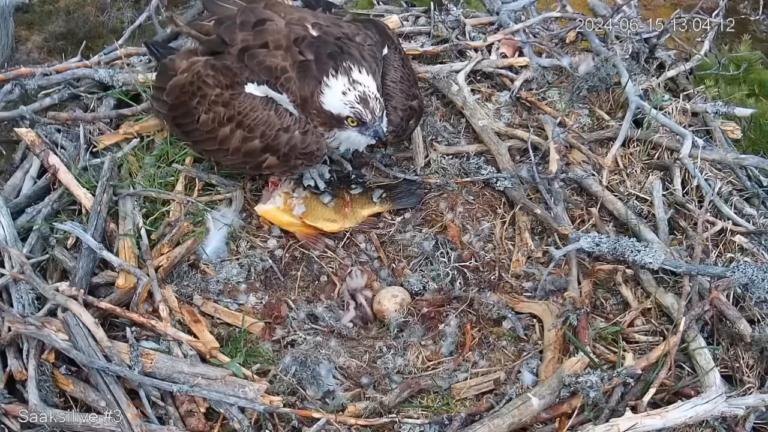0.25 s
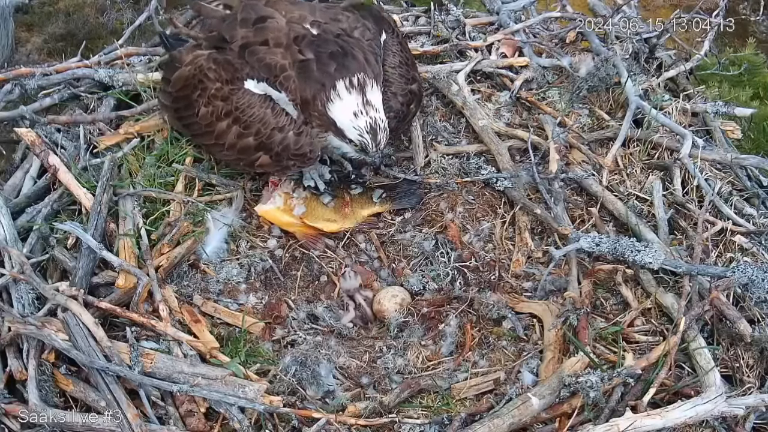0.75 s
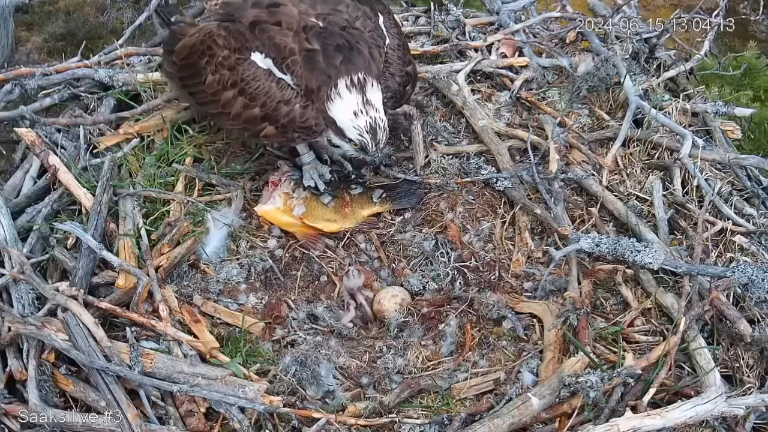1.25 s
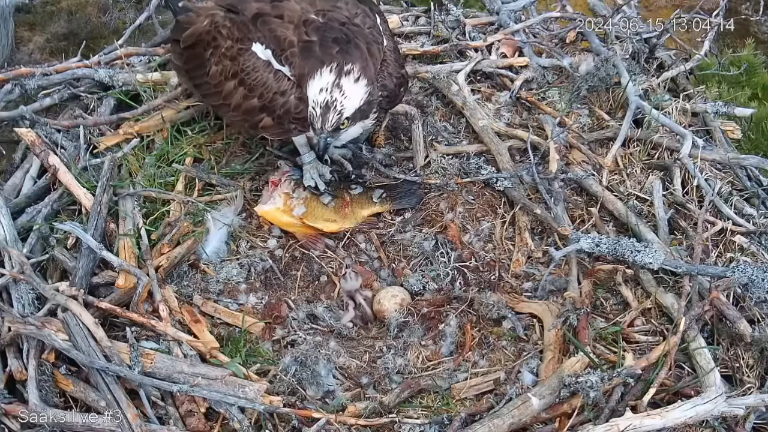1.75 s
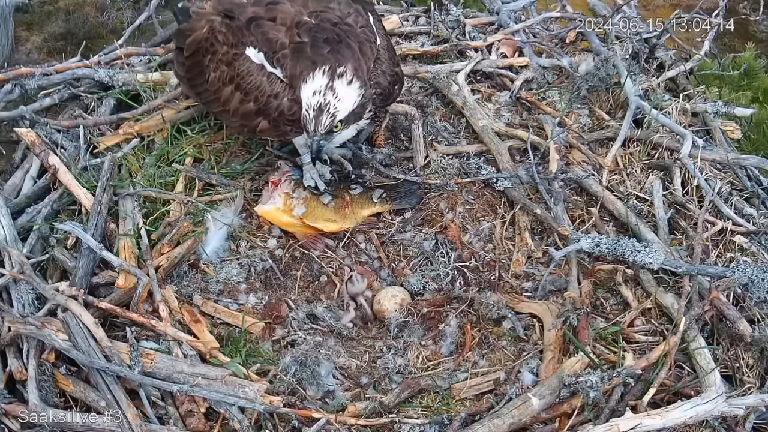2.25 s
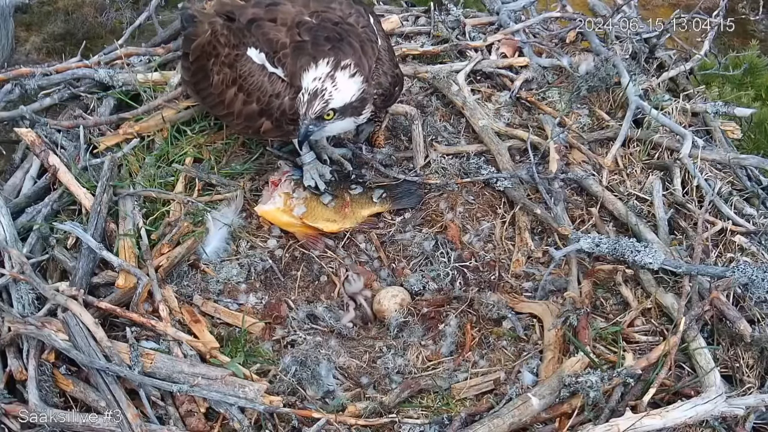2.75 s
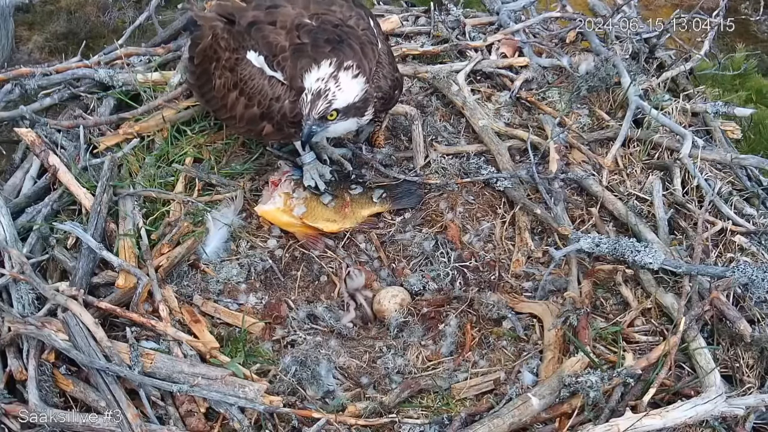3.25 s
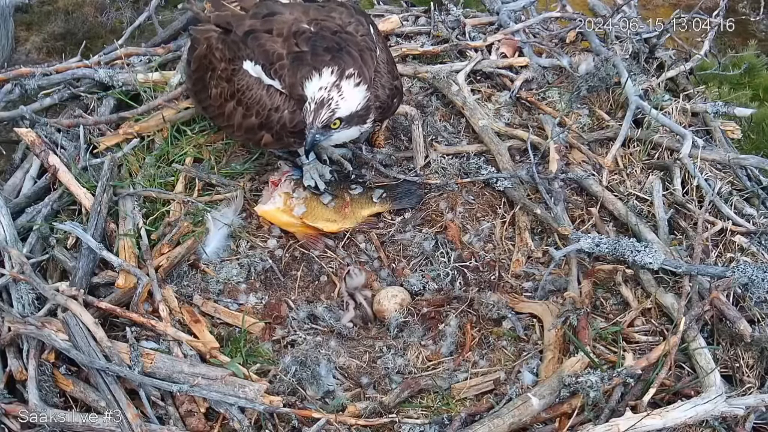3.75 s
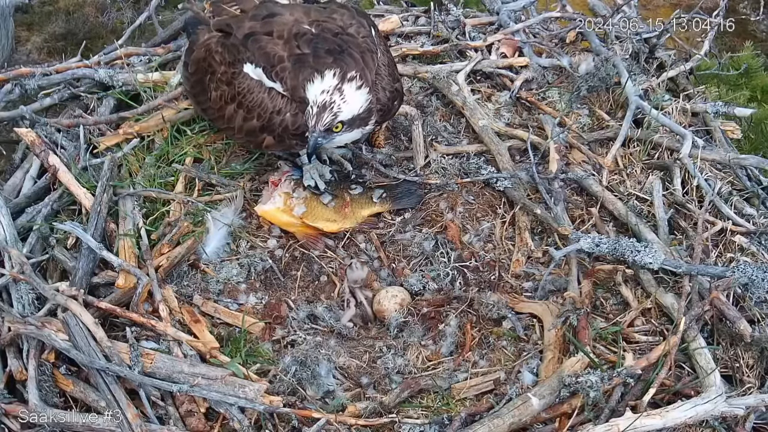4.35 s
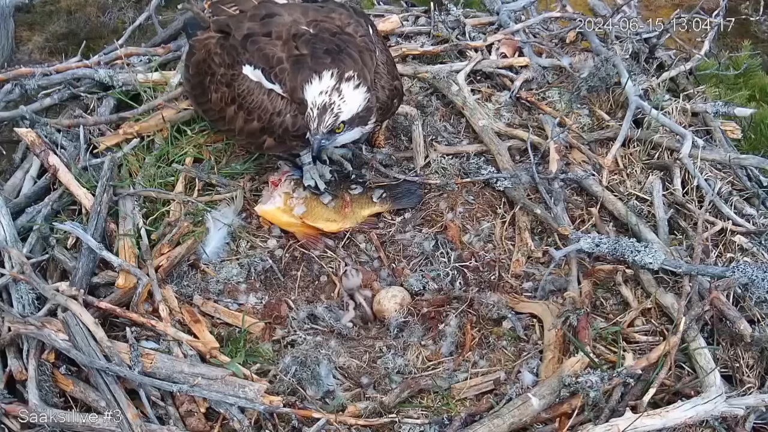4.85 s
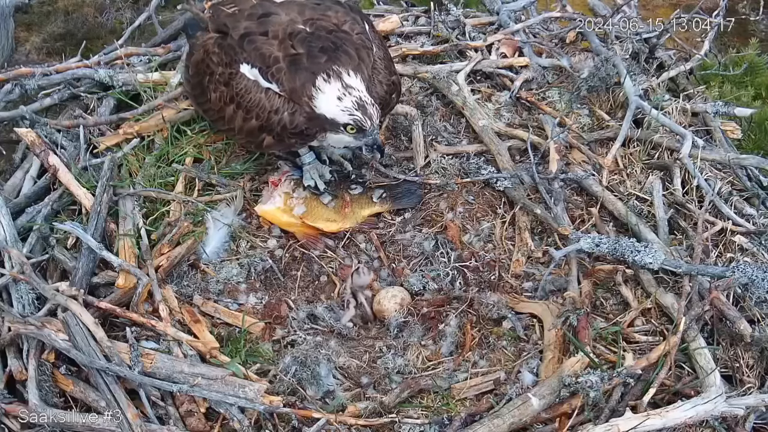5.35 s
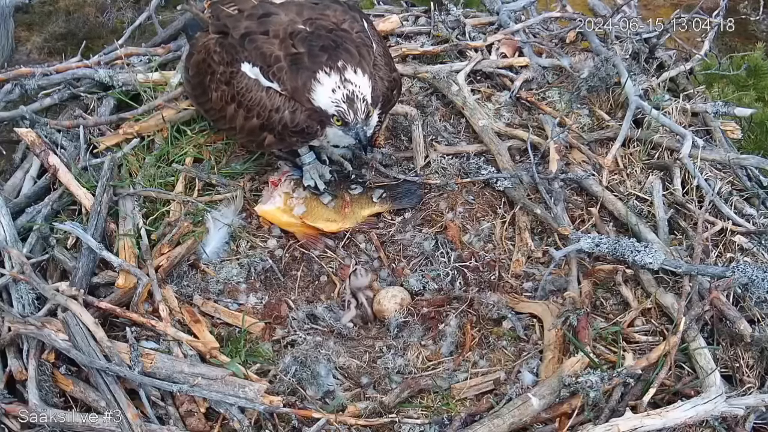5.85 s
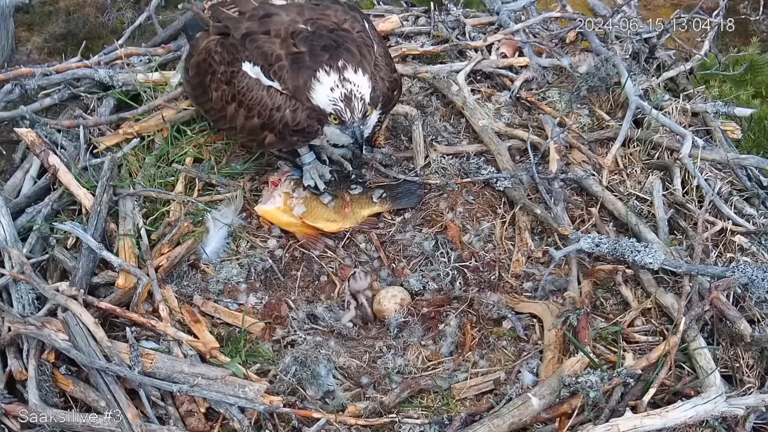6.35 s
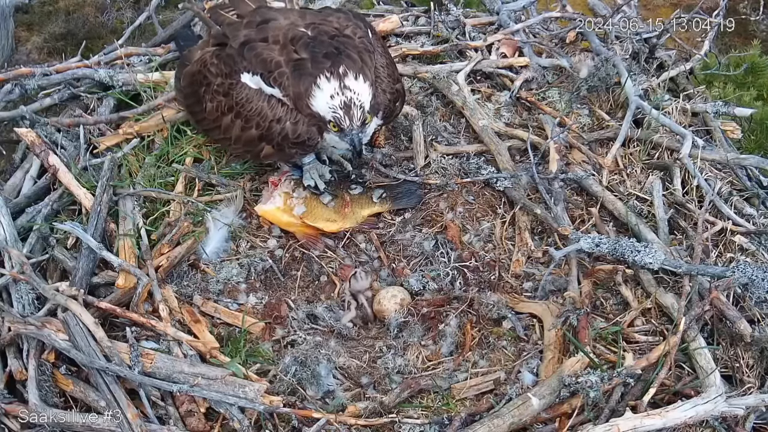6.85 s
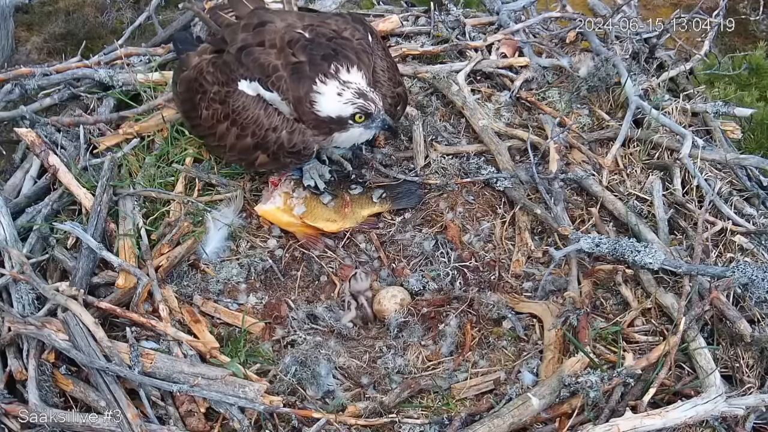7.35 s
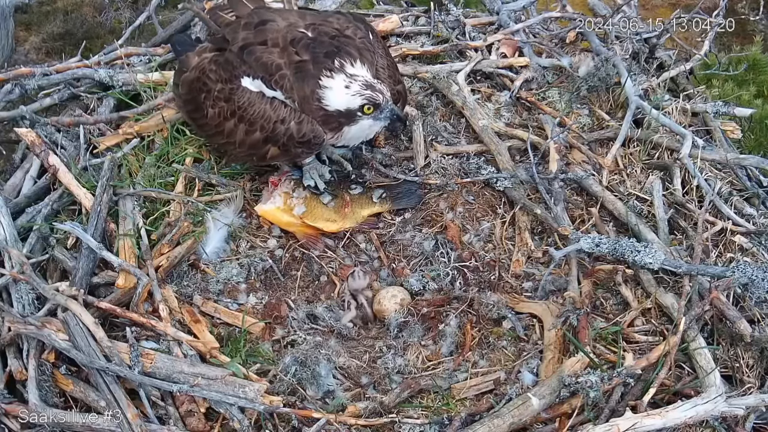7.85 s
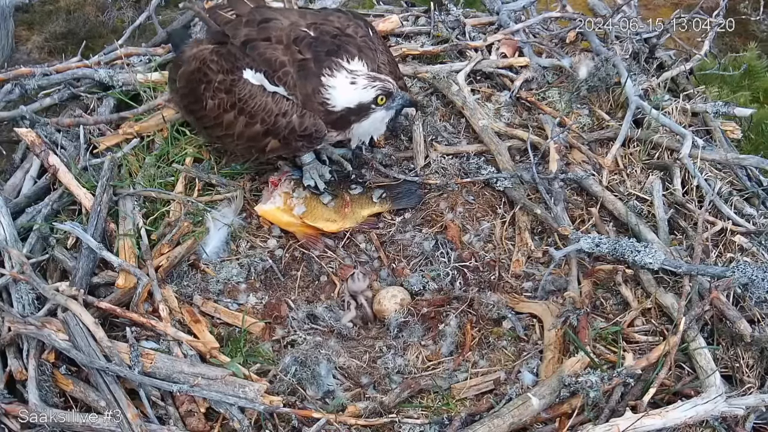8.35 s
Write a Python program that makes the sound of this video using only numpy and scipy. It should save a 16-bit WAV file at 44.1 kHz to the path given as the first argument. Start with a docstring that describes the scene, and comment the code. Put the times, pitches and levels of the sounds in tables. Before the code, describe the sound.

Close bursts of sharp, rasping whistles from an osprey on its nest, then small stick taps and a faint distant songbird.

```python
"""Eight arched begging calls from an osprey, close by on its stick nest.
Each opens as a rasp of rattling syrinx membranes and breaks into a clean whistle, which sometimes
trills as the two sides of the syrinx beat. Beak and talons tap, twigs tick, a small bird sings
far off, and a light breeze hisses in the trees."""
import sys
import numpy as np
from scipy import signal
from scipy.fft import rfft, irfft
from scipy.io import wavfile
from scipy.ndimage import uniform_filter1d, map_coordinates

SR = 44100
rng = np.random.default_rng(int(sys.argv[2]) if len(sys.argv) > 2 else 0)


def inscribe(sig):
    """Save sig as 16-bit PCM at rate SR to the path in sys.argv[1].

    A 1-D sig is mono; a 2-D sig holds one channel per row.
    Samples are clipped to [-1, 1] before scaling.
    """
    pcm = np.round(np.clip(np.atleast_2d(sig).T, -1, 1) * 32767)
    wavfile.write(sys.argv[1], SR, pcm.astype(np.int16))


N = 378819
TIME = np.arange(N) / SR

# syrinx rattles: (start [s], end [s], level [dB], change by the end [dB], swell [s],
# initial slap rate [1/s], throat resonance [Hz], tilt above it [dB/octave])
RATTLES = [(0, 0.08, -42, 3.5, 0.00071, 580, 5800, 0), (0.11, 0.175, -38.5, -13.5, .004, 600, 6050, 1),
           (0.224, 0.264, -43, -4, 0.0011, 940, 6060, 4), (0.566, .791, -42.5, -6, 0.073, 650, 4550, -0.5),
           (1.269, 1.44, -42, -4, 0.029, 640, 4850, 1), (1.565, 1.603, -48, 0, .001, 890, 5800, 8),
           (1.914, 2.092, -36.5, -10, .012, 850, 6330, -4), (2.245, 2.264, -57, -2, 0.0011, 500, 6200, 1),
           (2.499, 2.635, -36.5, -5, .015, 710, 6150, -3), (2.791, 2.822, -39, 2, 0.0051, 940, 6000, -1),
           (3.115, 3.307, -39, 0, .014, 770, 5840, -4), (3.398, 3.456, -44.5, -15, 0.00089, 680, 5470, 4),
           (4.957, 5.215, -40.5, -5.5, 0.0054, 560, 6520, -4),
           (5.674, 5.891, -37, -10, 0.0014, 690, 6170, -0.5)]
# beak and talons on sticks and fish: (time [s], level [dB], t60 [s], centre [Hz], knock re crack [dB])
NEST_TAPS = [(.324, -38.5, 0.013, 5200, 0), (.972, -46, 0.022, 7300, -9), (3.934, -48, 0.031, 4600, -26),
             (4.473, -48.5, 0.023, 9300, -18), (4.574, -55.5, 0.14, 4640, -8),
             (6.167, -50, 0.013, 7400, -12), (6.192, -52.5, 0.15, 4920, -28), (6.277, -51, 0.11, 4670, -15),
             (6.357, -32.5, 0.02, 6740, -6), (6.745, -52.5, 0.045, 7500, -6),
             (6.784, -32.5, 0.0075, 6600, -5.5), (6.792, -42.5, 0.034, 8350, -8),
             (7.883, -43, 0.019, 4660, -18)]


def undb(db):
    """Decibels to gain."""
    return 10 ** (np.asarray(db) / 20)


def unit(x):
    """Scale to rms 1."""
    return x / np.sqrt(np.mean(x ** 2) + 1e-20)


def spectrum_db(points, hz):
    """Interpolate (frequency [Hz], level [dB]) points on a log-frequency axis."""
    point_hz, db = np.transpose(points)
    return np.interp(np.log(np.maximum(hz, 1)), np.log(point_hz), db)


def resonate(x, hz, width_hz):
    """Two-pole resonance, gain 1 at its centre."""
    return signal.lfilter(*signal.iirpeak(min(hz, .45 * SR), hz / width_hz, fs=SR), x)


def band(x, lo_hz, hi_hz):
    """Butterworth band-pass."""
    return signal.sosfilt(signal.butter(2, [lo_hz, hi_hz], "band", fs=SR, output="sos"), x)


def walk(rate_hz, size):
    """Smooth random wander, spread near 1."""
    knots = rng.standard_normal(int(size * rate_hz / SR) + 4)
    return map_coordinates(knots, [1 + np.arange(size) * rate_hz / SR], order=3, mode="nearest")


def span(start_s, end_s):
    """Sample slice between two times."""
    first = int(np.clip(start_s * SR, 0, N - 200))
    return slice(first, int(np.clip(end_s * SR, first + 100, N)))


def arch(first, middle, last, size):
    """Parabola through three values."""
    return np.polyval(np.polyfit([0, .5, 1], [first, middle, last], 2), np.linspace(0, 1, size))


def gate(size, edge_s):
    """Window with rounded edges."""
    return signal.windows.tukey(size, min(1, 2 * edge_s * SR / size))


def add(track, start_s, x):
    """Mix x into track."""
    first = int(np.clip(start_s * SR, 0, N - 1))
    track[first:first + len(x)] += x[:N - first]


def branch_echo(x, wet_db, t60_s):
    """Sticks and branches add a dense, fading echo."""
    t = TIME[:SR // 3]
    echo = rng.standard_normal(len(t)) * undb(-60 * t / t60_s) * (t > .001)
    return x + undb(wet_db) * signal.fftconvolve(x, echo / np.linalg.norm(echo))[:N]


def breeze(leaves_db=10, hiss_db=-58, hiss_gust_share=.31, flicker_db=.9):
    """Leaves swell with the gusts under a steadier hiss; each band flickers."""
    # leaf noise: (frequency [Hz], relative density [dB])
    leaf_spectrum = [(18, -68), (30, -39.5), (284, -18), (323, -16), (499, -10.5), (732, -6), (1020, -2.5),
                     (1620, -2.5), (2440, -1.5), (2770, -2), (2990, -3), (4860, -7), (7310, -8.5),
                     (9930, -10.5), (13500, -23)]
    # breeze strength: (time [s], relative level [dB])
    gusts = [(0.0, -72.5), (0.16, -75.5), (2.13, -77.5), (3.23, -74), (5.24, -75), (6.48, -72.5),
             (7.68, -74.5), (8.59, -68.5)]
    gust_db = np.interp(TIME, *np.transpose(gusts))
    treble_db = hiss_db + hiss_gust_share * (gust_db - gust_db.mean())
    hz = np.arange(N // 2 + 1) * SR / N
    rustle = irfft(rfft(rng.standard_normal(N)) * undb(spectrum_db(leaf_spectrum, hz)), N)
    bins = rfft(unit(rustle))
    edges_hz = [0, 350, 700, 1400, 2800, 4500, 7000, 10000, SR]
    out = np.zeros(N)
    for lo_hz, hi_hz in zip(edges_hz, edges_hz[1:]):
        hiss_mix = min(1, lo_hz / 6000)
        db = (1 - hiss_mix) * (gust_db + leaves_db) + hiss_mix * treble_db + flicker_db * walk(9, N)
        out += undb(db) * irfft(bins * (hz >= lo_hz) * (hz < hi_hz), N)
    return out


def songbird(middle_hz=5200):
    """Short hooks and falling whistles, fluttering on their way through the trees."""
    # distant song: (time [s], length [s], start [Hz], end [Hz], level [dB])
    notes = [(3.068, 0.044, 5700, 5070, -56), (7.547, 0.03, 5100, 5300, -64),
             (7.66, 0.025, 5100, 4840, -63), (7.762, .031, 5150, 4700, -61),
             (7.934, 0.048, 5580, 4500, -62), (8.104, 0.047, 5580, 4600, -60),
             (8.253, 0.066, 5620, 4580, -62), (8.42, .054, 5550, 4820, -63.5)]
    out = np.zeros(N)
    for start_s, length_s, start_hz, end_hz, db in notes:
        size = int(length_s * SR)
        hz = arch(start_hz, middle_hz, end_hz, size) * (1 + .0032 * walk(450, size))
        tone = np.sqrt(2) * np.sin(2 * np.pi * np.cumsum(hz) / SR)
        flutter = 1 + .32 * walk(200, size)
        add(out, start_s, undb(db) * gate(size, .011) * flutter * tone)
    return out


def click(time_s=5.676, db=-52, corner_hz=500):
    """Small dull click as the last call starts."""
    out = np.zeros(N)
    add(out, time_s, undb(db) * np.exp(-2 * np.pi * corner_hz * TIME[:SR // 50]))
    return out


def tap(t60_s, hz, knock_db, upper_mode_db=-6):
    """Dry crack in two stick modes over a wooden knock; long ones start softly, as scrapes."""
    t = TIME[:SR // 6]
    noise = rng.standard_normal(len(t))
    lower, upper = (resonate(noise, ratio * hz, .13 * hz) for ratio in (1, 1.6))
    crack = unit(band(lower + undb(upper_mode_db) * upper, 3700, 12000))
    knock = unit(band(.48 * resonate(noise, 2480, 700) + resonate(noise, 3250, 500), 1100, 4000))
    attack_s = .0001 + .06 * t60_s ** 2
    return (crack + undb(knock_db) * knock) * undb(-60 * t / t60_s) * (1 - np.exp(-t / attack_s))


def settling_twigs(faintest_db=-63, spread_db=6.9, mean_delay_s=.09, ticks_per_tap=4):
    """Each tap unsettles a few twigs, which tick just after it."""
    out = np.zeros(N)
    for tap_s, *_ in NEST_TAPS:
        for wait, force, pitch in rng.random((ticks_per_tap, 3)):
            delay_s = -mean_delay_s * np.log(1 - wait)
            tick = tap(t60_s=.026, hz=4500 + 4000 * pitch, knock_db=-12)
            add(out, tap_s + delay_s, undb(faintest_db + spread_db * force) * tick)
    return out


def nest(faintest_db=-66, spread_db=7, tick_count=200):
    """Beak and talon taps, plus faint ticks of dry twigs shifting under the bird."""
    out = np.zeros(N)
    for tap_s, db, t60_s, hz, knock_db in NEST_TAPS:
        add(out, tap_s, undb(db) * tap(t60_s, hz, knock_db))
    for when, force, length, pitch in rng.random((tick_count, 4)):
        tick = tap(t60_s=.024 + .12 * length, hz=4500 + 5000 * pitch, knock_db=-18)
        add(out, when * N / SR, undb(faintest_db + spread_db * force ** 2) * tick)
    return out


def trill(sharpness=.54, lower_sideband=.22):
    """Complex gain as the two sides of the syrinx beat: sharp dips, sidebands mostly above the tone."""
    # beating: (start [s], end [s], first rate [Hz], middle rate [Hz], last rate [Hz], depth [0-1])
    trills = [(1.517, 1.55, 440, 400, 390, 0.13), (2.117, 2.152, 300, 380, 300, 0.07),
              (3.377, 3.387, 122, 120, 220, 0.5), (5.219, 5.297, 401, 840, 700, 0.29),
              (5.886, 5.947, 250, 440, 86, .45)]
    gain = np.ones(N, complex)
    for start_s, end_s, *rates_hz, depth in trills:
        part = span(start_s, end_s)
        size = part.stop - part.start
        beat_hz = arch(*rates_hz, size) * (1 + .013 * walk(320, size))
        phasor = np.exp(2j * np.pi * np.cumsum(beat_hz) / SR)
        sidebands = phasor / (1 - sharpness * phasor)
        gain[part] -= depth * gate(size, .0024) * (sidebands + lower_sideband * np.conj(sidebands))
    return gain


def rattle_roughness(build_s=.006):
    """How hard the rattling syrinx shakes the whistle, 0-1."""
    rough = np.zeros(N)
    for start_s, end_s, *_ in RATTLES:
        part = span(start_s, end_s)
        rough[part] = 1 - np.exp(-np.abs(TIME[part] - start_s) / build_s)
    return uniform_filter1d(rough, size=64)


def rasp(size, rate_hz, throat_hz, tilt_db_per_octave, slowing=.25, jitter=.2, uneven_db=1.6, air_db=-12):
    """Uneven, slowing membrane slaps and a little rushing air ring the throat."""
    # one slap: (frequency [Hz], relative level [dB])
    slap_spectrum = [(100, -75), (1200, -25), (2100, -10.5), (2800, -11), (3500, -18), (4300, -16),
                     (5200, -6), (6000, -5), (6900, -6.5), (7800, 0), (9000, -2), (10200, -8),
                     (11500, -16.5), (13500, -28)]
    timing, force = rng.standard_normal((600, 2)).T
    progress = np.minimum(np.arange(len(timing)) * SR / (rate_hz * size), 1)
    gaps = SR / (rate_hz * (1 - slowing * progress)) * np.exp(jitter * timing)
    onsets = np.cumsum(gaps).astype(int)
    inside = onsets < size
    slaps = np.bincount(onsets[inside], undb(uneven_db * force[inside]), size)
    drive = unit(slaps) + undb(air_db) * rng.standard_normal(size)
    hz = np.arange(size // 2 + 1) * SR / size
    # a wider beak lets out more above the throat resonance
    beak_db = tilt_db_per_octave * np.log2(np.maximum(hz / throat_hz, 1))
    coloured = irfft(rfft(drive) * undb(spectrum_db(slap_spectrum, hz) + beak_db), size)
    return unit(coloured + 4 * resonate(coloured, throat_hz, width_hz=700))


def call_contour(t, call, onset_overtone_db=-43):
    """Pitch and source levels of a call: an upswoop, crests of effort, then a drop."""
    # pushes of effort: (time [s], pitch [Hz], sag before the next crest, negative bulges [Hz],
    # fundamental [dB], overtones [dB])
    crests = [(-0.011, 2692, 491, -39, -43), (0.089, 3465, 379, -35.5, -58.5),
              (0.206, 3587, 0.0, -38.5, -41), (0.638, 2795, 349.5, -33, -69),
              (0.831, 3539, 0.0, -38.5, -45), (1.329, 3013, 423, -33, -58), (1.472, 3765, 118, -40, -45),
              (1.519, 3770, 0.0, -38, -48), (1.975, 2880, 641.5, -36.5, -46),
              (2.116, 3626, 148, -38, -46.5), (2.213, 3900, 0.0, -32.5, -38.5),
              (2.564, 2988, -150.0, -36, -42.5), (2.693, 3540, 86.5, -37, -55),
              (2.757, 3825, 0.0, -37, -42.5), (3.187, 3003, 307.5, -35.5, -44.5),
              (3.35, 3673, 110.0, -37.5, -57.5), (3.41, 3185, 0.0, -36.5, -42.5),
              (5.014, 2520, 330.0, -38, -44), (5.148, 3108, 259.5, -38.5, -51.5),
              (5.238, 3568, -120.0, -43, -43.5), (5.298, 3504, -5, -50, -43),
              (5.727, 2705, 299.5, -33.5, -45), (5.915, 3720, 0.0, -43, -45)]
    start_s, end_s, start_hz, end_hz, drop_exponent, end_db, end_overtone_db = call
    own_crests = [crest for crest in crests if start_s < crest[0] < end_s]
    crest_s, crest_hz, sag_hz, crest_db, crest_overtone_db = np.transpose(own_crests)
    indices = np.arange(len(crest_s))
    progress, index = np.modf(np.interp(t, crest_s, indices))
    ride_hz = np.interp(index + np.sin(np.pi * progress / 2) ** 2, indices, crest_hz)
    ride_hz -= sag_hz[index.astype(int)] * np.sin(np.pi * progress) ** 2
    swoop_hz = (start_hz - crest_hz[0]) * np.interp(t, [start_s, crest_s[0]], [1, 0]) ** 2
    drop_hz = (end_hz - crest_hz[-1]) * np.interp(t, [crest_s[-1], end_s], [0, 1]) ** drop_exponent
    fundamental_db = np.interp(t, [*crest_s, end_s], [*crest_db, end_db])
    overtone_db = np.interp(t, [start_s, *crest_s, end_s],
                            [onset_overtone_db, *crest_overtone_db, end_overtone_db])
    return ride_hz + swoop_hz + drop_hz, fundamental_db, overtone_db


def whistle(call, rough, beating, rolloff_db_per_octave=-11.5, rattle_db=-1.5, release_s=.0046):
    """Harmonic glide through the throat resonances, shaken while the syrinx rattles."""
    # throat and beak response: (frequency [Hz], gain [dB])
    throat = [(1400, -24.5), (1900, -17.5), (2850, -11), (3650, -15), (4300, -12), (5350, 2.5), (5900, 4.5),
              (6350, -1), (6850, -0.5), (7150, 2.5), (7750, 10.5), (8600, 6.5), (9500, -3.5), (11300, -1),
              (12100, -14), (13500, -20)]
    part = span(call[0], call[1])
    size, rough, beating = part.stop - part.start, rough[part], beating[part]
    hz, fundamental_db, overtone_db = call_contour(TIME[part], call)
    jitter = .0012 * walk(300, size) + .022 * rough * walk(1800, size)
    phase = 2 * np.pi * np.cumsum(hz * (1 + jitter)) / SR
    skew = .26 * rough * walk(1500, size)  # deformed cycles smear the overtones
    flutter = (.13 + .21 * rough) * walk(1200, size)
    release = 1 - np.exp(-((call[1] - TIME[part]) / release_s) ** 2)  # overtones die first
    out = np.zeros(size)
    for k in range(1, 8):
        if k == 1:  # the fundamental is steadier
            gain = undb(fundamental_db + .6 * walk(60, size)) * (1 + .66 * flutter)
        else:
            db = overtone_db + rolloff_db_per_octave * np.log2(k / 2) + rattle_db * rough
            gain = release * undb(db + 1.55 * walk(71.3, size)) * (1 + flutter)
        phasor = np.exp(1j * (k * phase + (k - 1) * skew))
        tone = np.sqrt(2) * np.imag(phasor * (beating if k < 3 else np.sqrt(beating)))
        top_fade = np.clip((SR / 3 - k * hz) / 1000, 0, 1)
        out += gain * undb(spectrum_db(throat, k * hz)) * top_fade * tone
    return out * gate(size, .0012)


def osprey(rasp_onset_db=-7, rasp_release_s=.0028, air_release_s=.013):
    """Whistles plus rasps; a rasp starts abruptly, swells, and dies as the call runs out of air."""
    # begging calls: (start [s], end [s], start pitch [Hz], end pitch [Hz], drop exponent [1 = straight],
    # final fundamental [dB], final overtones [dB])
    calls = [(-0.1, 0.268, 1300.0, 1675, 1.34, -34, -41.5), (0.568, 0.908, 1550.0, 1730, 2.66, -36, -44.5),
             (1.268, 1.603, 1370.0, 1996, 1.93, -37, -41), (1.91, 2.283, 1320.0, 2180, 1.46, -40.5, -45),
             (2.495, 2.829, 1500.0, 1583, 1.83, -33.5, -42.5), (3.117, 3.463, 1300.0, 1605, 1.8, -31, -37),
             (4.957, 5.37, 1160.0, 1900, 2.5, -42.5, -63.5), (5.677, 6.018, 2010.0, 1534, 2.77, -31, -38)]
    whistles, rasps, airflow = np.zeros(N), np.zeros(N), np.ones(N)
    beating, rough = trill(), rattle_roughness()
    for call in calls:
        start_s, end_s = call[:2]
        add(whistles, start_s, whistle(call, rough, beating))
        ending = span(end_s - .1, end_s + .1)
        airflow[ending] = 1 - np.exp(-(np.maximum(end_s - TIME[ending], 0) / air_release_s) ** 2)
    for start_s, end_s, db, change_db, swell_s, rate_hz, throat_hz, tilt_db_per_octave in RATTLES:
        part = span(start_s, end_s + .0011)
        size = part.stop - part.start
        t = TIME[:size]
        level_db = db + rasp_onset_db * np.exp(-t / swell_s) + np.linspace(0, change_db, size)
        release = 1 - np.exp(-t[::-1] / rasp_release_s)
        envelope = undb(level_db) * release * gate(size, .0006)
        rasps[part] += envelope * rasp(size, rate_hz, throat_hz, tilt_db_per_octave)
    return whistles + airflow * rasps


def scene():
    """Nest near and dry, songbird far off among trees; both channels alike."""
    near = branch_echo(osprey() + nest() + settling_twigs(), wet_db=-13.5, t60_s=.039)
    far = branch_echo(songbird(), wet_db=-7, t60_s=.15)
    mono = near + far + breeze() + click()
    return np.array([mono, mono])


def record(dry):
    """The sound cuts out for an instant in the second call; steep low-pass."""
    gap_start_s, gap_end_s, cutoff_hz = .6505, .662, 13750
    gain = 1 - .98 * ((TIME > gap_start_s) & (TIME < gap_end_s))
    return signal.sosfilt(signal.ellip(10, .2, 70, cutoff_hz, fs=SR, output="sos"), dry * gain)


dry = scene()
out = record(dry)
inscribe(out)
```